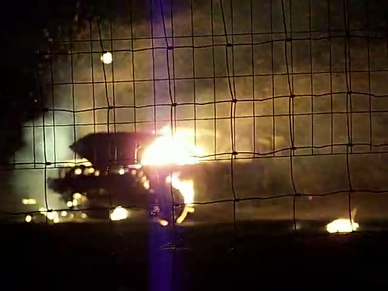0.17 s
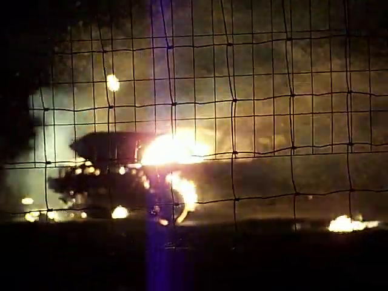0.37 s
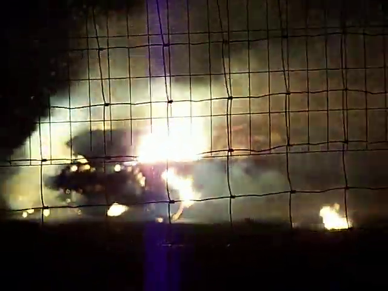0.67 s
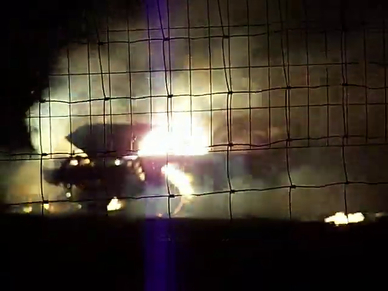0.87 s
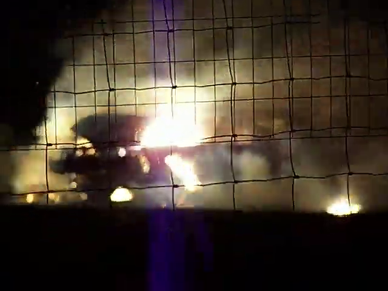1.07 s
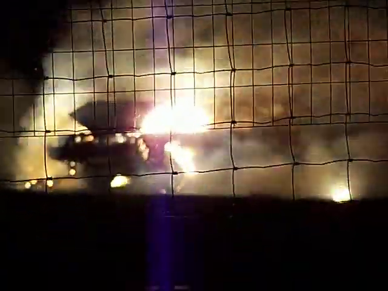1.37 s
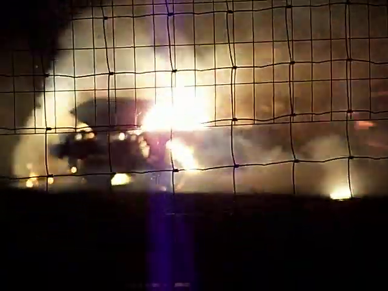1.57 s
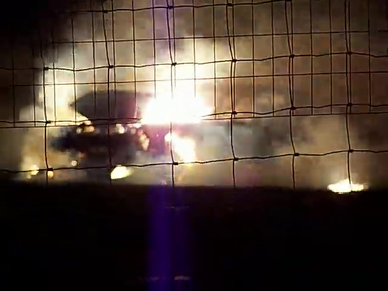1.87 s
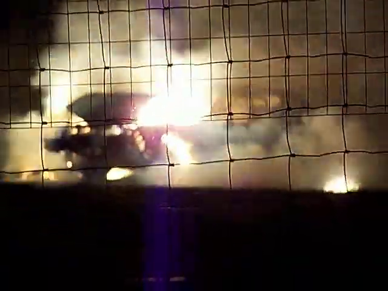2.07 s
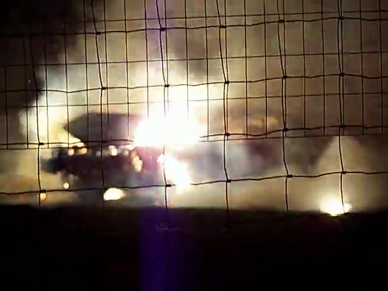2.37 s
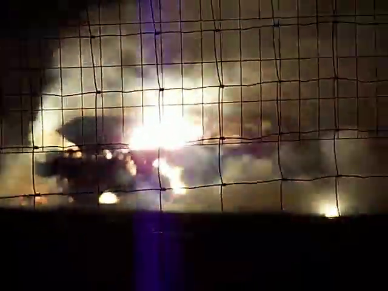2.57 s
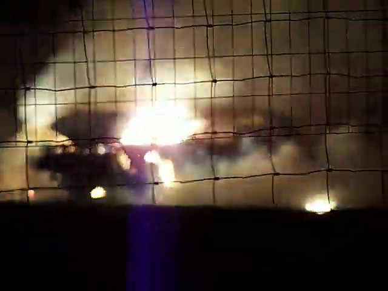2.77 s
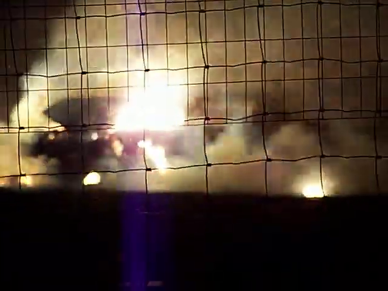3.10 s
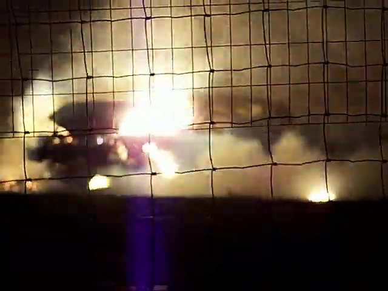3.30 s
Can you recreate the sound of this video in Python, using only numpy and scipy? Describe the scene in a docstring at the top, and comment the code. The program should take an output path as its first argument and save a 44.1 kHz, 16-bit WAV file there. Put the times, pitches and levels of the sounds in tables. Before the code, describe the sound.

A jet engine screams with a piercing high whine over a steady roar and deep rumble outdoors.

```python
"""A jet engine runs steadily outdoors: its compressor screams on a blade tone inside a hump of hiss.
Weaker shaft orders sound beside it; they and the tone are sines locked to the shaft's turning.
The exhaust roars and rumbles behind: flickering noise, shaped in spectrum and level.
Ground and walls echo; a small camera rounds the peaks and samples coarsely, mirroring some treble."""
import sys
import numpy as np
from scipy import signal
from scipy.fft import rfft, irfft
from scipy.io import wavfile

SR = 44100
rng = np.random.default_rng(int(sys.argv[2]) if len(sys.argv) > 2 else 0)


def volts_from_decibels(level):
    """Turn decibel levels (scalar or array-like) into linear amplitude factors."""
    exponent = np.asarray(level, float) / 20
    return 10 ** exponent


def unload_audio(sound):
    """Save the sound as a 16-bit wav file, at the path given as the first command line argument."""
    columns = np.transpose(np.atleast_2d(sound))
    # keep every value between -1 and 1, then stretch to whole-number steps
    steps = np.round(np.clip(columns, -1, 1) * 32767)
    wavfile.write(sys.argv[1], SR, steps.astype(np.int16))


N = 151704  # length in samples
HZ = np.fft.rfftfreq(N, 1 / SR) + 1e-9  # frequency of each spectral bin, kept above zero for the logs


def rms_one(x):
    """Scale to rms 1."""
    return x / np.sqrt(np.mean(x ** 2) + 1e-20)


def in_time(rows):
    """A (time, value) table as one value per sample."""
    s, value = np.transpose(rows)
    return np.interp(np.arange(N) / SR, s, value)


def at_hz(points):
    """A (frequency, dB) table as a gain per spectral bin, near silent outside the table."""
    hz, db = np.transpose(points)
    return volts_from_decibels(np.interp(np.log(HZ), np.log(hz), db, left=-120, right=-120))


def drift(corner_hz):
    """Random wander of spread about 1: noise through two equal low-pass poles, one value per 40 samples."""
    pole = np.exp(-2 * np.pi * corner_hz * 40 / SR)
    noise = rng.standard_normal(N // 40 + 2002)
    slow = signal.lfilter([1], [1, -2 * pole, pole * pole], noise)[2000:]  # skip the filter's start
    return np.interp(np.arange(N) / 40, np.arange(len(slow)), rms_one(slow - slow.mean()))


def turbulence(colour, level, patchy_db, flicker_hz):
    """Noise whose half-octave bands flicker on their own, then follow a level curve and a spectrum."""
    white = rfft(rng.standard_normal(N))
    place = 2 * np.log2(HZ / 12)  # half octaves above 12 Hz
    lowest = int(2 * np.log2(colour[0][0] / 12))
    highest = int(2 * np.log2(colour[-1][0] / 12)) + 1
    noise = 0
    for band in range(lowest, highest + 1):
        share = np.clip(1 - np.abs(place - band), 0, 1)
        noise = noise + irfft(white * share, N) * volts_from_decibels(patchy_db * drift(flicker_hz))
    curve = volts_from_decibels(in_time(level))
    coloured = irfft(rfft(noise * curve) * at_hz(colour), N)
    return np.sqrt(np.mean(curve ** 2)) * rms_one(coloured)


# low rumble, before the rumble trim: (time [s], level [dB])
RUMBLE_LEVEL = [(0.0, -22), (0.07, -27), (0.66, -26), (0.69, -18), (0.72, -36), (0.8, -23), (0.97, -29),
                (1.58, -25), (1.67, -30), (1.86, -24), (1.98, -28), (2.02, -25.5), (2.76, -29.5),
                (2.78, -25), (3.28, -30), (3.33, -24), (3.36, -32.5), (3.44, -28)]
# its relative spectrum: (frequency [Hz], gain [dB])
RUMBLE_SPECTRUM = [(45, -29), (58, -2), (72, -2.5), (90, -5), (112, -4.5), (122, -8.5), (132, -17.5),
                   (145, -19.5), (200, -59.5)]
# deepest thudding, before the same trim: (time [s], level [dB])
THUD_LEVEL = [(0.0, -25.5), (0.09, -18), (0.16, -27.5), (0.82, -29.5), (1.07, -25), (1.09, -30),
              (1.8, -24.5), (1.83, -36.5), (2.13, -27), (2.3, -37), (2.37, -27), (2.65, -32.5), (2.68, -25),
              (3.03, -25.5), (3.14, -37), (3.2, -21.5), (3.29, -36), (3.44, -29.5)]
# its relative spectrum: (frequency [Hz], gain [dB])
THUD_SPECTRUM = [(12, -34), (22, -14.5), (28, -12), (36, -3), (48, 1), (58, -7.5), (70, -31.5)]


def exhaust_rumble():
    """Deep noise of the jet mixing with still air, with thudding below it."""
    patchy_db, flicker_hz = -0.1, 4.0
    rumble = turbulence(RUMBLE_LEVEL and RUMBLE_SPECTRUM, RUMBLE_LEVEL, patchy_db, flicker_hz)
    thud = turbulence(THUD_SPECTRUM, THUD_LEVEL, patchy_db, flicker_hz)
    return volts_from_decibels(-1.04) * (rumble + thud)


# exhaust roar, before the crackle: (time [s], level [dB])
ROAR_LEVEL = [(0, -25.5), (.5, -25.5), (1.0, -25.5), (1.5, -25), (2.0, -25), (2.4, -25), (2.75, -26),
              (3.1, -25.5), (3.44, -25.5)]
# its relative spectrum: (frequency [Hz], gain [dB])
ROAR_SPECTRUM = [(600, -36.5), (720, -14), (810, -10.5), (900, -8.5), (1000, -10.5), (1160, -14.5),
                 (1450, -9.5), (1650, -14.5), (2000, -10), (2400, -9), (2900, -11.5), (3300, -15),
                 (3700, -15.5), (4200, -18), (5300, -30.5), (6200, -39.5)]
# low body of the roar, before its trim: (time [s], level [dB])
BODY_LEVEL = [(0, -24.5), (.2, -27), (.4, -25), (.65, -26), (.78, -26.5), (.9, -26.5), (1.1, -25.5),
              (1.35, -26), (1.6, -26), (1.8, -25.5), (2.1, -26.5), (2.45, -25.5), (2.6, -26), (2.72, -24),
              (3.0, -25.5), (3.2, -25.5), (3.44, -25.5)]
# its relative spectrum: (frequency [Hz], gain [dB])
BODY_SPECTRUM = [(90, -45.5), (140, -2), (175, -1), (205, 1.5), (216, -5.5), (232, -9.5), (243, -1.5),
                 (265, -2), (290, -6.5), (320, -7.5), (360, -6.5), (400, -8), (560, -7.5), (650, -8),
                 (720, -12), (860, -34)]


def exhaust_roar():
    """Broad noise of the jet mixing with still air; rough burning shakes its upper part fast."""
    patchy_db = 0.46
    crackle_db, crackle_hz = 0.8, 120
    roar = turbulence(ROAR_SPECTRUM, ROAR_LEVEL, patchy_db, 16.0)
    crackle = volts_from_decibels(crackle_db * drift(crackle_hz))
    body = turbulence(BODY_SPECTRUM, BODY_LEVEL, patchy_db, 12.0)
    return crackle * roar + volts_from_decibels(-0.85) * body


HUMP_PATCHY_DB = 0.73  # flicker of the hiss in the skirt and the hump

# hiss on the lower skirt of the hump: (time [s], level [dB])
SKIRT_LEVEL = [(0, -33), (.44, -33), (1.05, -34), (1.3, -31.5), (1.7, -30.5), (2.09, -29.5), (2.5, -32.5),
               (2.86, -34), (3.2, -33.5), (3.44, -31.5)]
# its relative spectrum: (frequency [Hz], gain [dB])
SKIRT_SPECTRUM = [(4000, -13), (4400, -10), (4700, -9), (5300, -6), (5700, -5.5), (6100, -2.5), (6500, 0),
                  (6900, -16)]


def hiss_skirt():
    """Turbulent hiss reaching down below the blade tone."""
    return turbulence(SKIRT_SPECTRUM, SKIRT_LEVEL, HUMP_PATCHY_DB, 9.0)


# hump of hiss, before its trim and the shimmer: (time [s], level [dB])
HUMP_LEVEL = [(0, -22), (.2, -17.5), (0.401, -19), (0.699, -20.5), (.95, -20), (1.1, -20), (1.3, -17.5),
              (1.599, -17), (1.85, -16), (2.1, -17.5), (2.2, -19), (2.4, -18.5), (2.6, -20), (2.7, -18.5),
              (2.9, -18.5), (3.1, -18), (3.301, -16), (3.44, -15.5)]
# its relative spectrum: (frequency [Hz], gain [dB])
HUMP_SPECTRUM = [(5700, -44.5), (6100, -26), (6500, -14), (6900, -8.5), (7050, -2), (7150, -2),
                 (7260, -3.5), (7320, 2.5), (7400, -6), (7700, -7), (8000, -13), (8300, -11)]


def hiss_hump():
    """Hiss heaped round the blade tone, which turbulent air smears."""
    return volts_from_decibels(-1.35) * turbulence(HUMP_SPECTRUM, HUMP_LEVEL, HUMP_PATCHY_DB, 22.0)


# shaft speed, creeping up: (time [s], speed [turns per s])
SHAFT_SPEED = [(0, 165.48), (.9, 165.61), (1.45, 165.68), (2.3, 165.73), (3.44, 165.76)]


def shaft_angle():
    """Angle of the shaft in radians: its speed summed over time."""
    return 2 * np.pi * np.cumsum(in_time(SHAFT_SPEED)) / SR


WANDER_RAD = 0.41  # phase wander of the tone and the orders

# shaft orders beside the blade tone: (cycles per turn)
ORDERS = [18, 19, 21, 22, 25, 28]
# rms level of each order before its flutter: (level [dB])
ORDER_LEVELS = [-46, -51, -51.5, -50, -35.5, -45.5]


def shaft_orders(angle):
    """Weaker sines at whole multiples of the shaft speed, each wavering on its own."""
    flutter_db = 1.5
    total = 0
    for order, db in zip(ORDERS, ORDER_LEVELS):
        level = volts_from_decibels(db + flutter_db * drift(2.0))
        phase = WANDER_RAD * drift(3.5) + rng.uniform(0, 2 * np.pi)
        total = total + level * np.sin(order * angle + phase)
    return np.sqrt(2) * total  # levels are rms


# blade tone, fading as the air between shifts; rms before flutter and shimmer: (time [s], level [dB])
TONE_LEVEL = [(0, -20), (.2, -37), (.32, -27.5), (.5, -26), (.7, -24.5), (.9, -31.5), (1.1, -24.5),
              (1.25, -20), (1.4, -19), (1.6, -18.5), (1.8, -19), (2.05, -22.5), (2.25, -28.5),
              (2.45, -20.5), (2.6, -26), (2.75, -20), (2.95, -22.5), (3.1, -23), (3.25, -19), (3.44, -17.5)]


def blade_tone(angle):
    """One sine cycle for each blade that passes, fluttering in level and phase."""
    blades = 44
    flutter_db, flutter_hz = 0.5, 40
    level = volts_from_decibels(in_time(TONE_LEVEL) + flutter_db * drift(flutter_hz))
    return np.sqrt(2) * level * np.sin(blades * angle + WANDER_RAD * drift(23.0))


def compressor():
    """Scream of tone and hump, shaken together by shifting air, plus shaft orders and hiss skirt."""
    shimmer_db, shimmer_hz = 0.5, 33
    angle = shaft_angle()
    scream = blade_tone(angle) + hiss_hump()
    shimmer = volts_from_decibels(shimmer_db * drift(shimmer_hz))
    return scream * shimmer + shaft_orders(angle) + hiss_skirt()


# echoes from ground and walls: (delay [s], gain [ratio], dull above [Hz])
ECHO_PATHS = [(0.01115, 0.43, 230), (.0021, 0.1, 730), (.0032, .12, 640), (0.018, 0.066, 1180),
              (0.037, 0.038, 590)]


def outdoors(x):
    """Direct sound plus a few dull echoes; the bass also bounces to and fro between two far walls."""
    round_trip_s, bounce_gain, dull_hz, lead_rad = .0461, 0.43, 330, 1.29
    paths = 1
    for delay, gain, hz in ECHO_PATHS:
        paths = paths + gain * np.exp(-2j * np.pi * HZ * delay) / (1 + (HZ / hz) ** 2)
    turned = np.exp(1j * (lead_rad - 2 * np.pi * HZ * round_trip_s))
    trip = bounce_gain * turned / (1 + (HZ / dull_hz) ** 2)
    return irfft(rfft(x) * paths / (1 - trip), N)  # 1 / (1 - trip) sums all the round trips


def scene():
    """Engine in the open, at the camera's input gain."""
    engine = exhaust_rumble() + exhaust_roar() + compressor()
    return volts_from_decibels(0.73) * outdoors(engine)[None]


def roll_off(x):
    """The treble ends steeply here."""
    return signal.sosfilt(signal.butter(12, 9200, fs=SR, output="sos"), x)


# deep narrow gap in the camera's response: (frequency [Hz], gain [dB])
RESPONSE_GAP = [(10, 0.5), (3300, 0), (3620, -3), (3900, -12.5), (4050, -16), (4190, -27), (4400, -12),
                (4600, -5.5), (5200, 0), (12000, 0.5)]
# smoothing filter after sampling, lets some mirrored treble through: (frequency [Hz], gain [dB])
SMOOTHING_FILTER = [(7000, 0.5), (7600, -0.5), (8000, -1.5), (8400, -12.5), (8700, -22.5), (8900, -30.5),
                    (9050, -51), (9200, -72)]


def record(dry):
    """Peaks round off, a gap is cut near 4 kHz, and coarse sampling mirrors treble about half its rate."""
    overload_top, sampling_hz = 0.53, 16000  # height that peaks bend towards; coarse sampling rate
    rounded = overload_top * np.tanh(dry[0] / overload_top)
    bins = rfft(rounded) * at_hz(RESPONSE_GAP)
    top = round(sampling_hz * N / SR)  # bin at the sampling rate
    mirrored = np.arange(top // 2 + 1, top)
    bins[top // 2 + 1:] = 0
    bins[mirrored] = np.conj(bins[top - mirrored])
    # the filter's first gain holds for everything below its first frequency
    first_hz, first_db = SMOOTHING_FILTER[0]
    smooth = np.where(HZ < first_hz, volts_from_decibels(first_db), at_hz(SMOOTHING_FILTER))
    mix = irfft(bins * smooth, N)[None]
    return roll_off(mix)


dry = scene()
out = record(dry)
unload_audio(out)
```